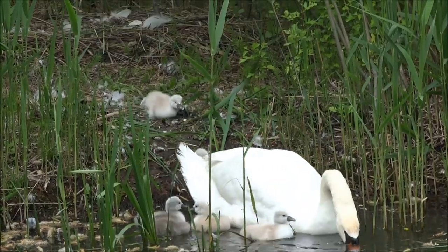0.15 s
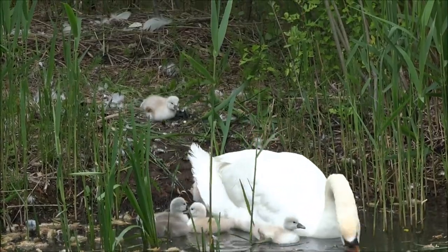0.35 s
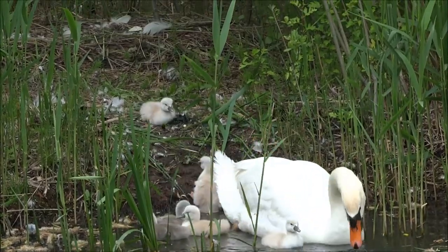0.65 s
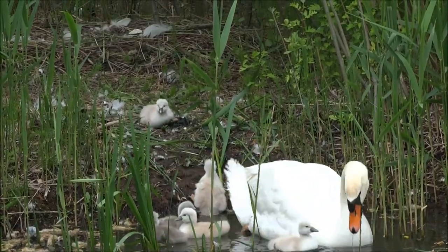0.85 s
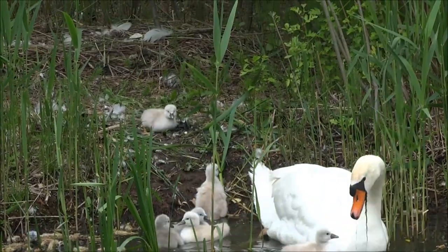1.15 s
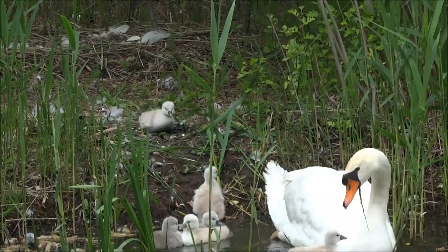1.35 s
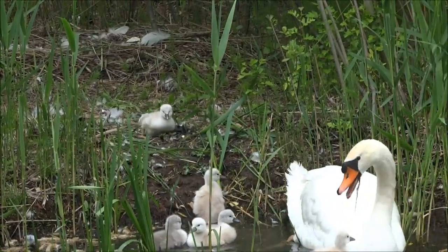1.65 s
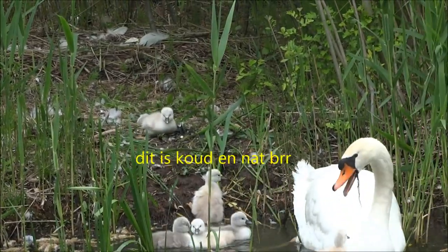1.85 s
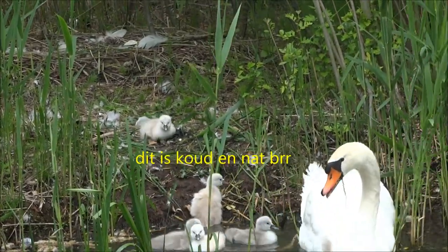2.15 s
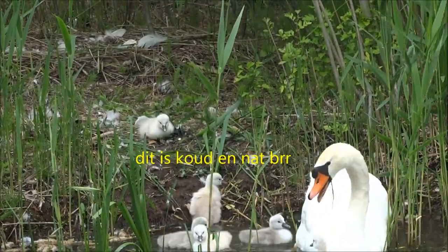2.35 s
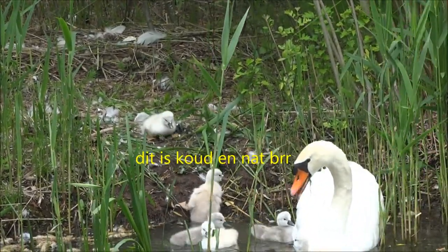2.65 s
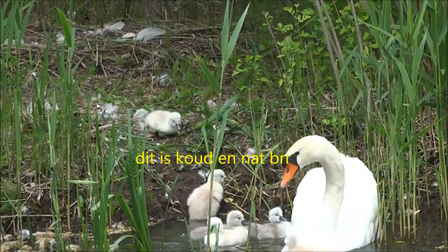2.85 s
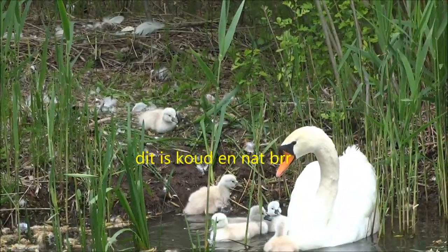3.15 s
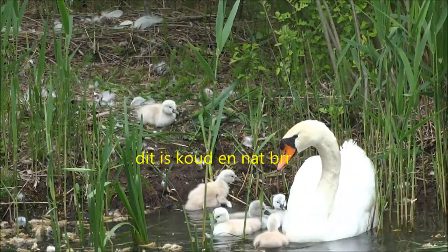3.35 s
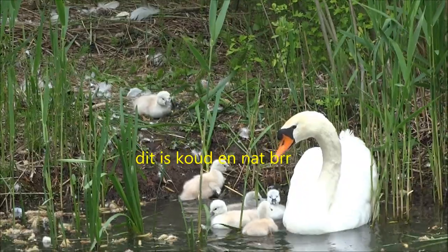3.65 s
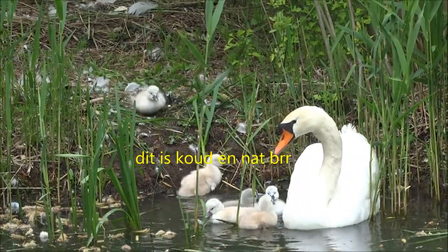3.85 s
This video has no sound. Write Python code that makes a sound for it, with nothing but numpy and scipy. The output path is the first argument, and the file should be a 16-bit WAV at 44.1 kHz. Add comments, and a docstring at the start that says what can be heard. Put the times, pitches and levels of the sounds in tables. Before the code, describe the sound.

A swan gives three short rising grunts in the first second and a half, at the water's edge, with faint cygnet whistles and peeps, small clicks, wind thumping the stereo microphones, distant traffic and reed hiss.

```python
"""At the water's edge a swan gives three short rising grunts: gliding harmonics filtered by its throat. Thin
after-notes near 2 kHz trail its first grunt, its cygnets peep faintly as gliding near-sinusoids, and small
clicks ring as struck resonances. Gusts buffet the microphones, hardest in the first second: low noise, swept
thumps and rattle. Behind lie distant traffic hum, a vehicle drawing nearer at the end, and rustling reeds:
shaped noise."""
import sys
import numpy as np
from scipy import signal
from scipy.io import wavfile
from scipy.ndimage import uniform_filter1d

SR = 44100
rng = np.random.default_rng(int(sys.argv[2]) if len(sys.argv) > 2 else 0)


def output_pcm(signal):
    """Save a mono or channel-first signal as 16-bit PCM at the path in sys.argv[1].

    Samples are clipped to [-1, 1] before scaling.
    """
    pcm = np.clip(np.atleast_2d(signal).T, -1, 1) * 32767
    wavfile.write(sys.argv[1], SR, np.round(pcm).astype(np.int16))


N = 175959

# left-right correlation of the traffic and reed noise: (f/Hz, correlation)
AIR_CORRELATION = [(300, .85), (700, .86), (1400, .91), (3000, .93), (6500, .98), (8300, .97), (9600, .8),
                   (11000, .95), (11700, 1)]


def amp(db):
    """Decibel law: amplitude ratio of a level in dB."""
    return 10 ** (np.asarray(db) / 20)


def evened(x):
    """Normalisation to unit root-mean-square amplitude."""
    return x / np.sqrt(np.mean(x ** 2) + 1e-20)


def read(points, hz):
    """Spectral interpolation along a logarithmic frequency axis."""
    f, value = np.transpose(points)
    return np.interp(np.log(hz + 1), np.log(f + 1), value)


def add(mix, s, sound):
    """Superposition of a sound on the mix from time s."""
    part = mix[..., max(round(s * SR), 0):][..., :sound.shape[-1]]
    part += sound[..., :part.shape[-1]]


def panned(x, db):
    """Interchannel level difference: left above right by db."""
    return x * amp([[db / 2], [-db / 2]])


def resonate(x, hz, width):
    """Resonance of gain 1: shift hz down to zero, low-pass with one pole, shift back."""
    turn = np.exp(2j * np.pi * hz * np.arange(len(x)) / SR)
    r = np.exp(-np.pi * width / SR)
    return 2 * (turn * signal.lfilter([1 - r], [1, -r], x / turn)).real


def drift(size):
    """Low-passed random fluctuation: noise smoothed three times over size samples."""
    x = rng.standard_normal(N)
    for _ in range(3):
        x = uniform_filter1d(x, size=size)
    return evened(x)


def noise(shape, same, patchy_db, flicker_db, size=1024):
    """Spectral synthesis: correlated stereo noise with drifting patches and flicker shared by all pitches."""
    hop = size // 4
    frames, hz = N // hop + 5, np.fft.rfftfreq(size, 1 / SR)
    a, b, c, d, patches = rng.standard_normal((frames, len(hz), 5)).T
    patches = uniform_filter1d(patches, size=12, axis=0)
    patches = evened(uniform_filter1d(patches, size=14, axis=1))
    flicker = evened(uniform_filter1d(rng.standard_normal(frames), size=5))
    correlation = np.clip(read(same, hz), -1, 1)[:, None]
    left, independent = a + 1j * b, c + 1j * d
    right = correlation * left + np.sqrt(1 - correlation ** 2) * independent
    inside = (hz >= .8 * shape[0][0]) & (hz <= 1.2 * shape[-1][0])
    gain = amp(read(shape, hz)[:, None] + patchy_db * patches + flicker_db * flicker)
    z = np.array([left, right]) * gain * inside[:, None]
    return evened(signal.istft(z, nperseg=size, noverlap=size - hop)[1][:, :N])


def level(curve):
    """Amplitude envelope interpolated linearly in decibels."""
    s, db = np.transpose(curve)
    return amp(np.interp(np.arange(N) / SR, s, db))


def columns(curve):
    """Sampled trajectories: start time, a fade at both ends, and every column at sample rate."""
    s, *cols = np.transpose(curve)
    t = np.arange(s[0], s[-1], 1 / SR)
    fade = np.clip(np.minimum(t - s[0], s[-1] - t) / 0.0036, 0, 1)
    return s[0], fade, [np.interp(t, s, c) for c in cols]


def swan():
    """Source-filter principle: an unsteady harmonic voice glides up and holds, weighted by the throat."""
    # grunts: (start t/s, length t/s, first f/Hz, held f/Hz, glide t/s, level/dB before swell,
    # brightness/dB per overtone once the pitch is held)
    grunts = [(0.576, 0.029, 667, 679, 0.017, -24.5, 2.5), (0.837, 0.088, 384, 645.6, 0.057, -26.5, .5),
              (1.21, 0.087, 403, 602, 0.061, -28, -4.5)]
    # throat transmission: (f/Hz, level/dB)
    throat = [(1300, 2.5), (1950, -2.5), (2380, -9), (2570, 3.5), (2720, -15.5), (3230, -15.5), (3400, -50),
              (4500, -22.5), (5500, -39.5), (7200, -26.5), (9500, -41.5)]
    attack_s, release_s = 0.0026, 0.018
    swell_db, fundamental_db = 4, -25
    dull_db = 5  # per overtone, while the pitch is still low
    jitter, roughness, rasp_share = .006, .21, .16  # pitch waver, level waver, fast breathy waver
    out = np.zeros(N)
    for start, length, first_hz, held_hz, glide, db, bright_db in grunts:
        t = np.arange(0, length, 1 / SR)
        rise = np.sin(np.pi / 2 * np.minimum(t / glide, 1)) ** 1.5
        hz = first_hz + (held_hz - first_hz) * rise
        edges = np.clip(np.minimum(t / attack_s, (length - t) / release_s), 0, 1)
        envelope = edges * amp(db + swell_db * (rise - 1.5))
        pitch_waver, level_waver = np.array([drift(size=55), drift(size=55)])[:, :len(hz)]
        rasp = drift(size=12)[:len(hz)]
        turns = np.cumsum(hz * (1 + jitter * pitch_waver)) / SR
        tilt_db = bright_db + dull_db * (rise ** 2 - 1)
        voice = np.zeros(len(t))
        for k in range(1, 15):
            harmonic_db = read(throat, k * hz) + tilt_db * (k - 2) + fundamental_db * (k == 1)
            voice += amp(harmonic_db) * np.cos(2 * np.pi * k * turns + k ** 2)
        unsteady = 1 + roughness * level_waver + rasp_share * rasp
        add(out, start, np.sqrt(2) * envelope * voice * unsteady)
    return out


def nostrils():
    """Turbulence noise filtered by resonances: a nasal hiss with the later two grunts."""
    # hisses: (centre t/s, length t/s, level/dB)
    snorts = [(0.902, 0.17, -38.5), (1.26, .14, -39.5)]
    # resonances, each applied three times: (f/Hz, width of one pass/Hz, relative level/dB)
    bands = [(7430, 1850, 1), (8200, 1200, 0), (2710, 1200, -3)]
    out = np.zeros(N)
    for centre, length, db in snorts:
        breath = rng.standard_normal(SR // 4)
        hiss = np.zeros(len(breath))
        for hz, width, band_db in bands:
            filtered = breath
            for _ in range(3):
                filtered = resonate(filtered, hz, width)
            hiss += amp(band_db) * filtered
        size = round(length * SR)
        add(out, centre - length / 2, amp(db) * evened(hiss)[:size] * np.hanning(size))
    return out


def cygnets():
    """Frequency modulation of near-pure tones: arched whistles with an octave, soft bending peeps, and thin
    after-notes that trail the swan's first grunt."""
    # two clear whistles, each a trajectory: (t/s, f/Hz, level/dB)
    whistles = [
        [(.225, 2080, -54), (.276, 2383, -45), (.292, 2725, -43), (.344, 3169, -39), (.372, 3235, -38),
         (.398, 3040, -36), (.408, 2721, -41), (.421, 2300, -52)],
        [(.985, 2100, -52), (1.0, 2240, -50), (1.034, 2584, -43), (1.05, 2625, -44), (1.066, 2510, -44),
         (1.1, 2030, -52)],
    ]
    # peeps and chirps; the first three rows are thin after-notes trailing the swan's first grunt: (start t/s,
    # length t/s, first f/Hz, middle f/Hz, last f/Hz, level/dB at mid-length)
    peeps = [(.599, .011, 1990, 2000, 2020, -37), (.642, .016, 2020, 2040, 2000, -39),
             (.665, .03, 2000, 2010, 2000, -42), (.385, .016, 2850, 2650, 2400, -46),
             (1.435, .025, 3400, 2950, 2400, -48), (2.13, .085, 2100, 2600, 2950, -54),
             (2.14, .025, 4400, 4330, 4250, -58), (2.18, .02, 2800, 2650, 2350, -53),
             (2.225, .02, 4750, 4730, 4700, -55), (2.425, .016, 2800, 2600, 2400, -51),
             (2.29, .035, 2650, 2800, 3000, -54), (2.348, .024, 3350, 2850, 2300, -50),
             (2.526, .018, 3250, 2800, 2350, -44.5), (2.875, .025, 3700, 3850, 3950, -57),
             (2.935, .04, 2350, 2700, 3050, -53), (2.985, .02, 2950, 2700, 2300, -51),
             (3.05, .04, 2100, 2450, 2600, -53), (3.135, .024, 3600, 2950, 2300, -52),
             (3.28, .05, 2350, 2900, 3500, -54), (3.332, .02, 3100, 2750, 2250, -51),
             (3.375, .065, 2300, 2600, 2700, -54), (3.562, .04, 4650, 4380, 4350, -58)]
    octave_db, octave_db_per_khz = -10, 25  # octave level at 3235 Hz, and its gain with pitch
    grow_db = 3  # a falling chirp goes from this far below its level to this far above, within the swell
    flutter = .27  # share by which the level wavers
    out = np.zeros(N)
    for curve in whistles:
        start, fade, (hz, db) = columns(curve)
        phase = 2 * np.pi * np.cumsum(uniform_filter1d(hz, size=500)) / SR
        octave = amp(octave_db + octave_db_per_khz * (hz - 3235) / 1000) * np.sin(2 * phase)
        add(out, start, np.sqrt(2) * amp(db) * fade * (np.sin(phase) + octave))
    for start, length, first_hz, mid_hz, last_hz, db in peeps:
        u = np.linspace(-1, 1, round(length * SR))
        bend_hz = (first_hz + last_hz) / 2 - mid_hz
        hz = mid_hz + (last_hz - first_hz) / 2 * u + bend_hz * u ** 2
        swell = np.sqrt(1 - u ** 4) * amp(grow_db * u * (last_hz < first_hz))
        tone = np.sin(2 * np.pi * np.cumsum(hz) / SR)
        add(out, start, np.sqrt(2) * amp(db) * swell * tone)
    return out * (1 + flutter * drift(size=90))


def clicks():
    """Impulse excitation: a brief noise burst rings through two equal resonances in series."""
    # clicks and cracks: (t/s, peak level/dB, ring f/Hz, width of one resonance/Hz)
    cracks = [(0.243, -30.5, 4940, 3000), (0.456, -25, 1000, 500), (.534, -23, 900, 1490),
              (.721, -22, 1140, 500), (0.923, -22, 2710, 280), (1.296, -25.5, 1050, 400),
              (1.476, -33.5, 4470, 2500), (3.074, -32, 6900, 3000)]
    out, t = np.zeros(N), np.arange(900) / SR
    for s, db, hz, width in cracks:
        burst = rng.standard_normal(len(t)) * t * np.exp(-t / 0.00096)
        ring = resonate(resonate(burst, hz, width), hz, width)
        add(out, s, amp(db) * ring / abs(ring).max())
    return out


def wind():
    """Turbulent pressure on two capsules: a lumpy low rumble, swept thumps and weakly correlated rattle."""
    # buffets: (centre t/s, nominal level/dB, nominal length t/s, thump f/Hz at its centre,
    # rattle relative to thump/dB before the common lift)
    buffets = [(0.027, -23.5, 0.03, 99, -20), (0.152, -18.5, 0.017, 115, -26), (0.19, -19, 0.057, 120, -17),
               (0.218, -28.5, 0.0067, 198, 2.5), (0.304, -11.5, 0.0092, 148, -15.5),
               (0.346, -22.5, 0.014, 137, -17), (0.4175, -20, 0.0044, 172, -11),
               (0.431, -12.5, 0.021, 131, -18.5), (0.458, -19.5, 0.01, 136, -3.5),
               (0.474, -19.5, 0.0084, 242, -8), (0.535, -16.5, 0.0044, 202, -6.5),
               (0.547, -14.5, 0.022, 113, -15.5), (0.633, -28.5, 0.027, 152, -6.5),
               (0.673, -21, 0.021, 126, -38), (0.705, -9.5, 0.018, 138, -24.5),
               (0.721, -20.5, 0.011, 199, 1), (0.743, -25.5, 0.022, 174, -2),
               (0.804, -19.5, 0.0041, 160, -15), (0.827, -20, 0.02, 150, -20),
               (0.848, -16, 0.03, 211, -9.5), (0.931, -27.5, 0.037, 140, -3),
               (0.974, -25.5, 0.016, 175, -2.5), (1.439, -22, 0.01, 145, -30),
               (1.483, -23.5, 0.052, 140, -19), (1.628, -31, 0.048, 132, -8.5),
               (1.729, -24.5, 0.032, 93.5, -42.5), (1.837, -21.5, 0.069, 106, -35),
               (1.884, -20.5, 0.03, 141, -31), (2.052, -29, 0.063, 141, -36), (2.5, -26, 0.068, 99, -44),
               (3.639, -25.5, 0.064, 120, -24), (3.727, -23.5, 0.03, 124, -19.5),
               (3.944, -30, 0.084, 104, -37)]
    # rattle spectrum: (f/Hz, level/dB)
    rattle_shape = [(120, -11.5), (280, 5.5), (500, -8.5), (900, -12), (1500, -20.5), (2500, -47)]
    # left-right correlation of the rattle: (f/Hz, correlation)
    rattle_correlation = [(100, .6), (300, 0), (700, -.2)]
    # steady wind level: (t/s, level/dB before panning)
    wind_level = [(0, -30.5), (.12, -39.5), (.16, -27), (.6, -28), (.95, -26), (1.05, -45), (1.3, -46.5),
                  (1.45, -34), (1.65, -34.5), (1.78, -46), (2.2, -39.5), (2.6, -39.5), (2.75, -62),
                  (3.4, -63), (3.65, -35), (3.99, -48)]
    # steady wind spectrum: (f/Hz, level/dB)
    wind_shape = [(20, -22), (40, -2), (100, 3), (170, -3.5), (280, -12), (500, -20), (1000, -37)]
    # left-right correlation of the steady wind: (f/Hz, correlation)
    wind_correlation = [(40, .96), (100, .68), (200, .45), (400, .1)]
    thump_split = .3  # radians, spread of the opposite phase shifts left and right
    rattle_stretch, rattle_lift_db = 1.11, 4.5
    crackle_db = 2.5  # spread of the rattle's fast bursts
    out = level(wind_level) * noise(wind_shape, wind_correlation, patchy_db=1.0, flicker_db=3.5, size=2048)
    rattle = noise(rattle_shape, rattle_correlation, patchy_db=1.5, flicker_db=1.5, size=512)
    rattle = evened(rattle * amp(crackle_db * drift(size=100)))
    t = np.arange(N) / SR
    gate = np.zeros(N)
    u = np.arange(-3000, 3000) / SR  # time about the centre of a buffet
    for centre, db, length, hz, rattle_db in buffets:
        bell = np.exp(-(u / 0.0029) ** 2) + .5 * np.exp(-(u / (0.44 * length)) ** 2)
        lag = thump_split * rng.standard_normal()
        sweep = 1 + 1.2 * u / 0.077 * rng.uniform(-1.1, 1)
        push = np.cos(2 * np.pi * hz * u * sweep + np.array([[lag], [-lag]]))
        thump = amp(db) * bell * push
        cut = max(round(3000 - centre * SR), 0)  # samples that would fall before time zero
        add(out, max(centre - 3000 / SR, 0), thump[:, cut:])
        rattle_bell = np.exp(-((t - centre) / (rattle_stretch * 0.57 * length)) ** 2)
        gate += amp(db + rattle_db + rattle_lift_db) * rattle_bell
    return panned(out + gate * rattle, db=0.7)


def traffic():
    """Incoherent summation of distant sources: hum, low rumble and a vehicle that draws nearer."""
    # hum spectrum: (f/Hz, level/dB)
    hum_shape = [(260, -10.5), (400, -11.5), (600, -9), (1100, -1.5), (1430, -6.5), (1900, -10.5),
                 (2500, -16), (3300, -20.5), (5000, -27.5), (6500, -50)]
    # hum level: (t/s, level/dB)
    hum_level = [(0, -39.5), (.6, -36.5), (1.2, -36.5), (1.5, -38.5), (2.3, -41), (2.9, -38.5), (3.4, -40),
                 (3.99, -41.5)]
    # rumble spectrum: (f/Hz, level/dB)
    rumble_shape = [(12, -48), (20, -11), (91, 2.5), (128, -6), (161, 0.5), (300, -19), (390, -44),
                    (660, -120)]
    # left-right correlation of the rumble: (f/Hz, correlation)
    rumble_correlation = [(30, .99), (300, .92)]
    # spectrum of the nearing vehicle: (f/Hz, level/dB)
    passing_shape = [(450, -29), (650, -7.5), (850, -2), (1050, -4)]
    # level of the nearing vehicle: (t/s, level/dB)
    passing_level = [(2.9, -46.5), (3.5, -43), (3.99, -37.5)]
    hum = level(hum_level) * noise(hum_shape, AIR_CORRELATION, patchy_db=0.97, flicker_db=0.4)
    rumble = noise(rumble_shape, rumble_correlation, patchy_db=1.94, flicker_db=2.0, size=2048)
    vehicle = level(passing_level) * noise(passing_shape, AIR_CORRELATION, patchy_db=1.7, flicker_db=0.5)
    return hum + amp(-38.5) * rumble + vehicle


def reeds():
    """Broadband noise of rustling reeds, shaped in spectrum and level."""
    # rustle spectrum: (f/Hz, level/dB)
    rustle_shape = [(2060, -4), (3500, -7), (4740, -5), (5120, -3.5), (6330, 1), (7820, 2), (10900, -17),
                    (11700, -21.5), (14800, -33.5)]
    # rustle level: (t/s, level/dB)
    rustle_level = [(0, -44.5), (.5, -43), (1.2, -45), (2, -46), (3, -47.5), (3.99, -49.5)]
    return level(rustle_level) * noise(rustle_shape, AIR_CORRELATION, patchy_db=1.36, flicker_db=0.5)


def scene():
    """Linear superposition of all sources; the one-channel ones sit in the centre."""
    return swan() + nostrils() + cygnets() + clicks() + wind() + traffic() + reeds()


def record(dry):
    """Band limitation: a linear-phase low-pass at 15050 Hz, its delay removed."""
    lowpass = signal.firwin(511, 15050, window=("kaiser", 9), fs=SR)
    return signal.oaconvolve(dry, lowpass[None], "same")


dry = scene()
out = record(dry)
output_pcm(out)
```